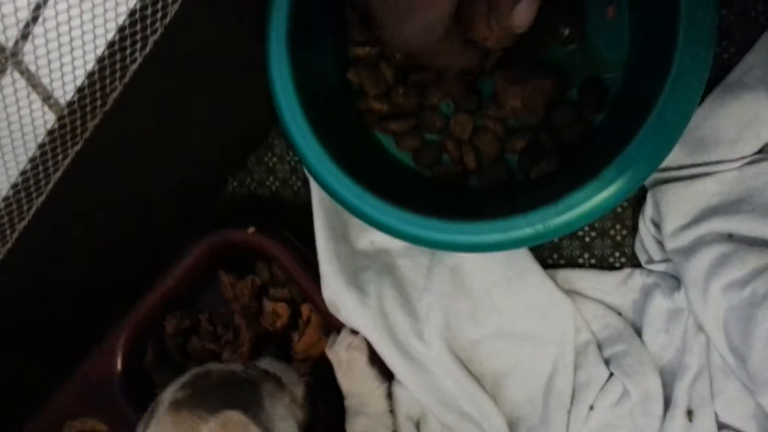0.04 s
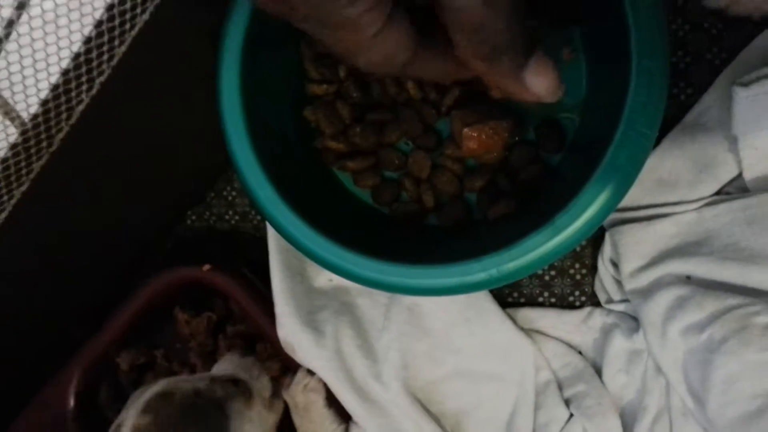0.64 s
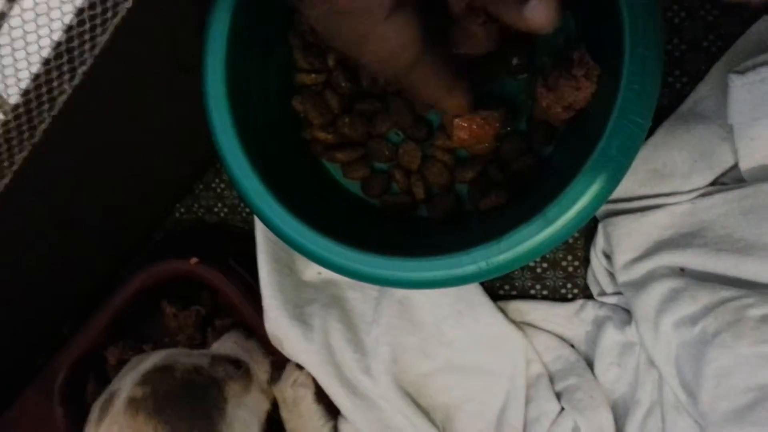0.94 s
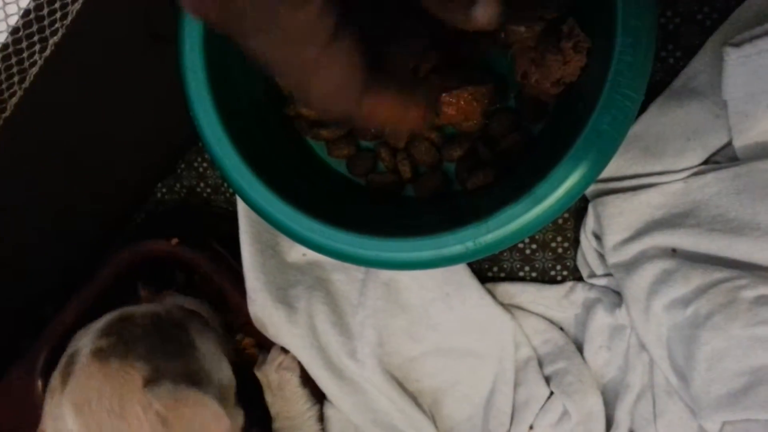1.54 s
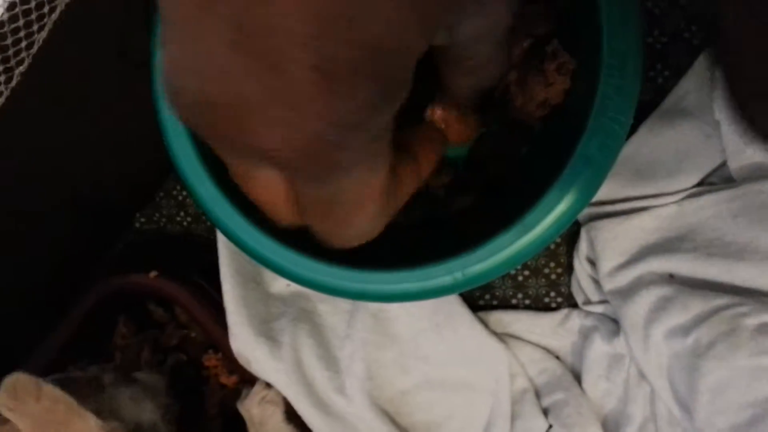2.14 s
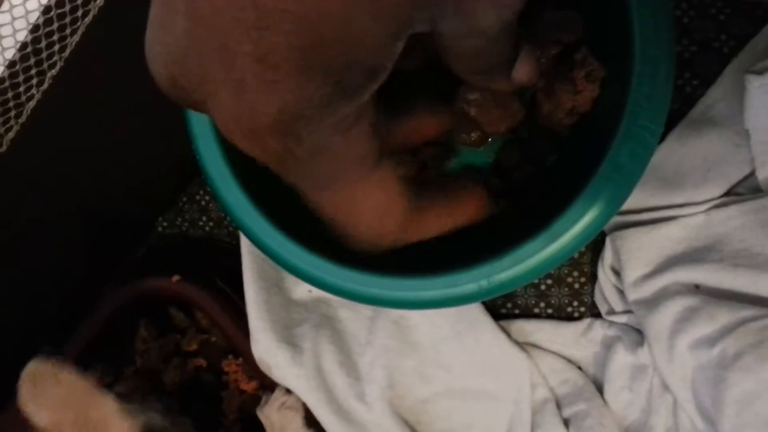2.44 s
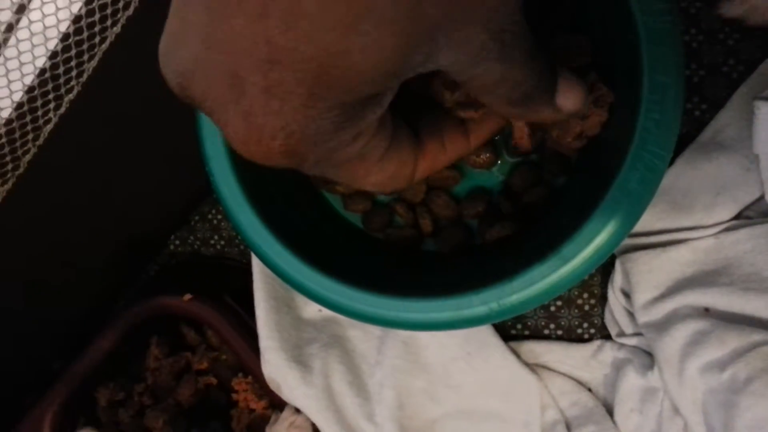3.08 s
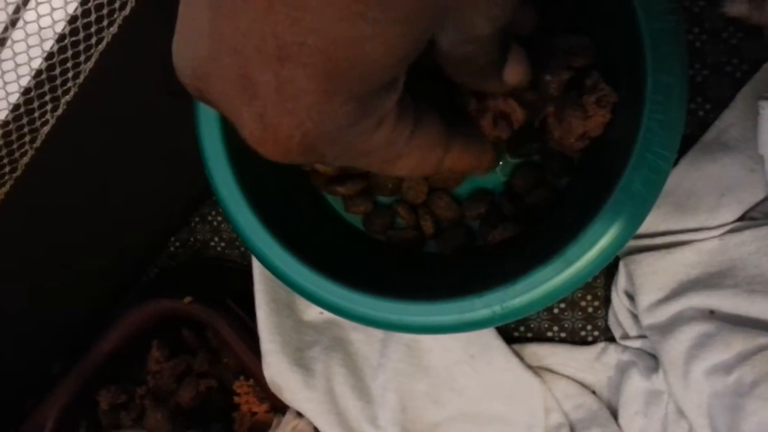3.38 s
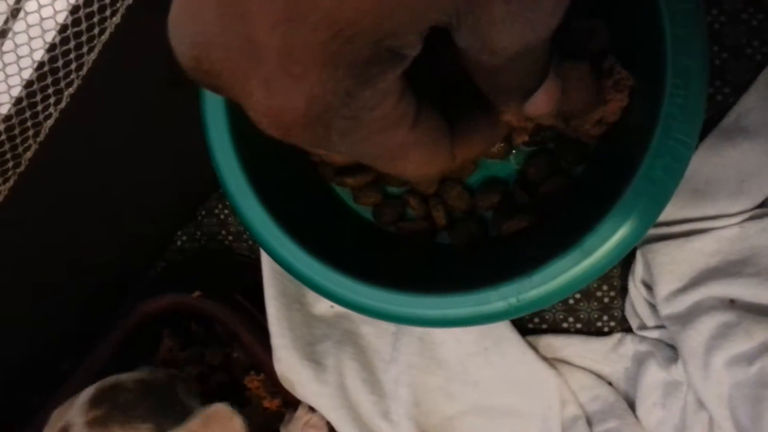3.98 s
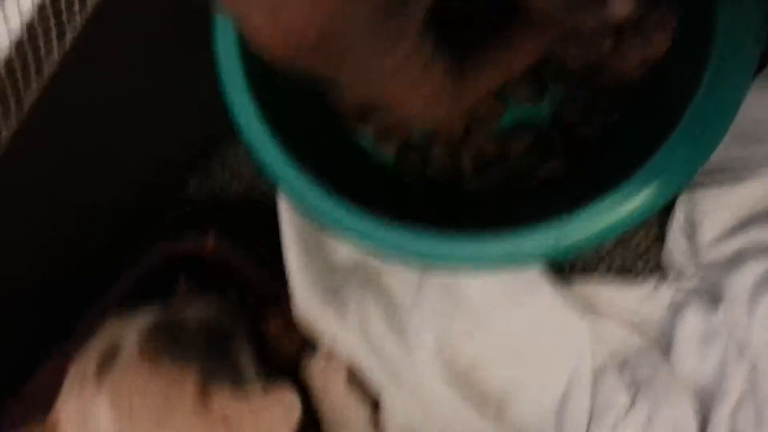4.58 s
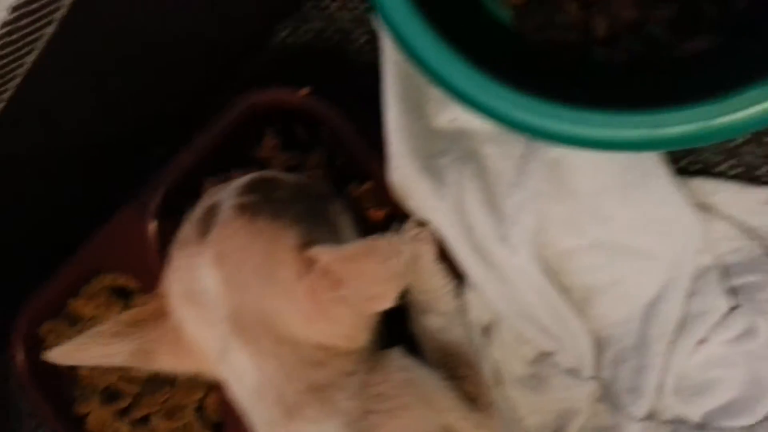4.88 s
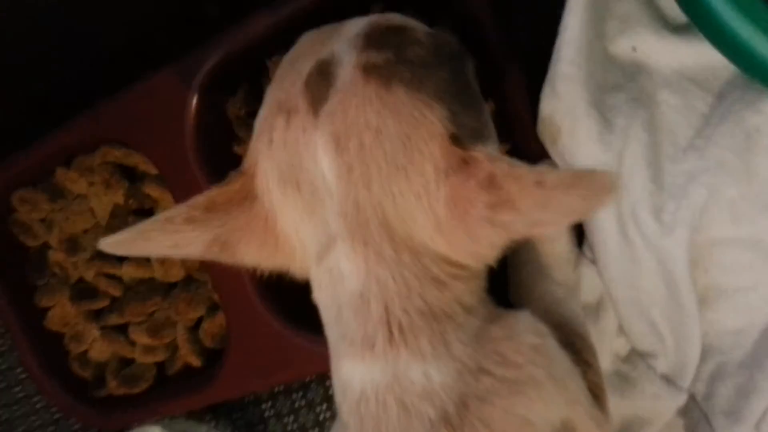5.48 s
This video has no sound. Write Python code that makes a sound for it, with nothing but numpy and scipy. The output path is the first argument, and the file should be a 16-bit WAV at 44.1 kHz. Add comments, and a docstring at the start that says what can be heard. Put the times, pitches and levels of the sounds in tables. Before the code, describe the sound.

Dry pellets rustle and click in a plastic bowl as a puppy eats nearby and shoves its food, with a fan humming.

```python
"""A hand stirs and scoops dry kibble in a plastic bowl, close to a stereo microphone in a small hard room.
Countless pellet contacts merge into a rustle; clumps give way, and bumps set the bowl ringing.
Beside it a puppy smacks and crunches, shoving food across a plastic dish that takes a hollow knock.
A fan hums in the background, and each of the two microphone ports rings at its own treble pitch."""
import sys
import numpy as np
from scipy import signal
from scipy.fft import rfft, irfft, next_fast_len
from scipy.io import wavfile

SR = 44100
rng = np.random.default_rng(int(sys.argv[2]) if len(sys.argv) > 2 else 0)


def bounce(signal):
    """Save signal as a 16-bit WAV file at the path given by the first command-line argument."""
    frames = np.transpose(np.atleast_2d(signal))
    limited = np.clip(frames, -1, 1)
    pcm = np.round(limited * 32767).astype(np.int16)
    wavfile.write(sys.argv[1], SR, pcm)


N = 247842
ROOM_T60_S, NEAR_T60_S = 0.74, 0.19
# The puppy's muzzle shoves food about. Each row: start in seconds, then chatter, grind and skid in dB.
MUZZLE_SHOVES = [(4.811, -34, -56, -17), (4.873, -24, -31, -34), (4.926, -31, -36, -32),
                 (5.036, -35, -34.5, -14), (5.113, -31, -37.5, -25), (5.158, -41, -39.5, -19),
                 (5.209, -43, -42, -12), (5.258, -35, -56, -9)]


def undb(db):
    """Decibels to gain."""
    return 10 ** (np.asarray(db) / 20)


def unit(x):
    """Scale to rms 1."""
    return x / np.sqrt(np.mean(x ** 2))


def colour(x, points):
    """Causal filter through (Hz, dB) points, built from the cepstrum."""
    size = 8192
    hz, db = np.transpose(points)
    bin_hz = np.maximum(np.arange(size // 2 + 1) * SR / size, 1)
    gain = undb(np.interp(np.log(bin_hz), np.log(hz), db))
    cepstrum = irfft(np.log(gain))
    cepstrum[1:size // 2] *= 2
    cepstrum[size // 2 + 1:] = 0
    response = irfft(np.exp(rfft(cepstrum)))
    padded = next_fast_len(N + size, True)
    return irfft(rfft(x, padded) * rfft(response, padded), padded)[..., :N]


def fade(t60):
    """Half a second of exponential decay, falling 60 dB in t60 seconds."""
    return np.exp(-np.log(1000) * np.arange(SR // 2) / SR / t60)


def burst(t60):
    """A short crack of dying noise."""
    return rng.standard_normal(SR // 2) * fade(t60)


def resonate(x, hz, width_hz):
    """One resonance, gain 1 at its centre."""
    return signal.lfilter(*signal.iirpeak(hz, hz / width_hz, fs=SR), x)


def add(track, start_s, sound, db):
    """Put a sound into the track with its peak at db."""
    start = int(start_s * SR)
    track[start:start + len(sound)] += (undb(db) * sound / np.abs(sound).max())[:N - start]


def swell(start_s, push_s, hold_s, settle_db_per_s):
    """Gain of one movement: it builds while pushed, holds, then dies as the food settles."""
    t = np.arange(N) / SR - start_s
    return np.clip(t / push_s, 0, 1) * undb(-settle_db_per_s * np.maximum(t - push_s - hold_s, 0))


def power_sum(swells, levels_db):
    """Overlapping movements add in power."""
    return np.sqrt(undb(levels_db) ** 2 @ swells ** 2)


def contacts(per_s, spread_db, spectrum):
    """Tiny random contacts of uneven hardness; only their long waves reach both ports alike."""
    hardness = undb(spread_db * np.minimum(rng.exponential(size=N), 5))
    mid, side = (rng.random(N) < per_s / SR) * hardness * rng.standard_normal((2, N))
    side = colour(side, [(220, -12), (650, 0)])
    return unit(colour(np.array([mid + side, mid - side]), spectrum))


def reflect(x, wet_db, t60, lag_ms):
    """The direct sound reaches the left port lag_ms late; dense reflections differ at each port."""
    tails = np.array([burst(t60) for _ in range(2)])
    tails /= np.linalg.norm(tails, axis=1, keepdims=True)
    left = np.pad(x, (int(lag_ms * SR / 1000), 0))[:N]
    reflections = signal.fftconvolve(x[None], tails, axes=1)[:, :N]
    wet = undb(wet_db)
    return (np.array([left, x]) + wet * reflections) / np.hypot(1, wet)


def fan():
    """The room's fan hums steadily over moving air, whose bass is much alike at both ports."""
    # Blade, shaft and mains tones. Each row: frequency in Hz, level in dB, left minus right in dB.
    tones = [(120.5, -48, 0), (149.8, -45.5, 1.5), (180.4, -58, 3), (244.6, -55, -5), (363, -50, 1.5)]
    # Rush of the air. Each row: frequency in Hz, gain in dB.
    air_spectrum = [(20, -33), (30, -25), (42, -29), (62, -8), (100, -6.5), (190, -3.5), (270, 2.5),
                    (400, 0), (520, -8.5), (700, -8.5), (1500, -20.5), (2500, -27), (5000, -29),
                    (9000, -47), (14500, -48)]
    t = np.arange(N) / SR
    hum = np.zeros((2, N))
    for hz, db, pan_db in tones:
        amplitude = np.sqrt(2) * undb(db + np.array([[pan_db], [-pan_db]]) / 2)
        hum += amplitude * np.sin(2 * np.pi * (hz * t + rng.random()))
    shared = colour(rng.standard_normal(N), [(150, 2), (350, 3), (700, -8), (2000, -49.5)])
    apart = colour(rng.standard_normal((2, N)), [(100, -1.5), (300, -5.5), (600, -4), (2000, 4)])
    return hum + undb(-42) * unit(colour(shared + apart, air_spectrum))


def chewing():
    """Each smack of the puppy is a brief crack, coloured by its small mouth and the hollow of the dish."""
    # Smacks and bites. Each row: start in seconds, relative level in dB, mouth resonance in Hz.
    bites = [(0.223, -49, 899), (0.269, -31.5, 1710), (0.483, -31, 1320), (0.848, -38.5, 1380),
             (1.032, -41, 1280), (1.206, -32.5, 1470), (1.322, -41, 1270), (1.617, -39, 2130),
             (1.887, -26.5, 1300), (2.004, -39, 2340), (2.044, -40.5, 1140), (2.809, -31, 1920),
             (2.851, -35, 1890), (3.128, -36.5, 1110), (3.526, -26, 1970), (3.538, -41, 1790),
             (3.696, -32.5, 1110), (3.715, -30, 1920), (3.84, -35, 1940), (3.851, -33, 1720)]
    track = np.zeros(N)
    muzzle_band = signal.butter(3, [420, 2400], "bandpass", fs=SR, output="sos")
    for start_s, db, mouth_hz in bites:
        crack = burst(t60=0.0084)
        smack = resonate(crack, mouth_hz, width_hz=800) + resonate(crack, hz=720, width_hz=600)
        add(track, start_s, signal.sosfilt(muzzle_band, smack), db)
    return undb(4.5) * reflect(track, wet_db=-4, t60=NEAR_T60_S, lag_ms=0.17)


def muzzle_gains():
    """Gains of the chatter and the grinding under the puppy's muzzle; all shoves share one shape."""
    starts, chatter_db, grind_db, _ = np.transpose(MUZZLE_SHOVES)
    swells = np.array([swell(s, push_s=0.0067, hold_s=0.02, settle_db_per_s=222) for s in starts])
    return power_sum(swells, chatter_db), power_sum(swells, grind_db)


def dish_scrape(chatter_gain):
    """Food shoved across the dish chatters, with sudden skids, and rings the dish's walls."""
    # Pellets scraping on plastic. Each row: frequency in Hz, gain in dB.
    scrape_spectrum = [(200, -24), (300, -17), (1200, 4.5), (1650, -8), (2050, 12), (2250, -13), (2550, 1),
                       (3200, -18), (8000, -18)]
    # Resonances of the walls. Each row: frequency in Hz, width in Hz, relative gain in dB.
    wall_modes = [(1614, 33, 5), (1920, 30, -22), (1980, 28, -31), (2265, 107, 1.5), (2440, 50, -13)]
    skid_delay_s, skid_hz, skid_width_hz = 0.00309, 2070, 430
    chatter = contacts(per_s=1700, spread_db=-2, spectrum=scrape_spectrum) * chatter_gain
    skids = np.zeros(N)
    for start_s, _, _, db in MUZZLE_SHOVES:
        skid = resonate(burst(t60=0.068), skid_hz, skid_width_hz)
        add(skids, start_s + skid_delay_s, resonate(skid, skid_hz, skid_width_hz), db)
    scrape = undb(-6.5) * chatter + undb(-18.5) * reflect(skids, wet_db=0, t60=ROOM_T60_S, lag_ms=0.52)
    walls = sum(undb(db) * resonate(scrape, hz, width_hz) for hz, width_hz, db in wall_modes)
    return scrape + undb(15) * walls


def vessel_blows(events, modes, rattle_t60, rattle_db, wet_db):
    """A blow, followed by a short rattle of pellets, sets the modes of a plastic vessel ringing."""
    lowest_hz = 204  # such small vessels radiate little below this
    t = np.arange(SR // 2) / SR
    ring = sum(undb(db) * fade(t60) * np.sin(2 * np.pi * hz * t) for hz, db, t60 in modes)
    ring = resonate(ring, hz=modes[1][0], width_hz=1600)  # the soft contact keeps to the low modes
    ring = signal.sosfilt(signal.butter(2, lowest_hz, "highpass", fs=SR, output="sos"), ring)
    track = np.zeros(N)
    for start_s, db in events:
        rattle = burst(rattle_t60)
        rattle *= undb(rattle_db) / np.linalg.norm(rattle)
        add(track, start_s, ring + signal.fftconvolve(rattle, ring)[:len(t)], db)
    return reflect(track, wet_db, ROOM_T60_S, lag_ms=0.05)


def dish_knock():
    """The puppy's dish takes one hollow knock and bounces."""
    # Knock and bounce. Each row: start in seconds, relative level in dB.
    knocks = [(4.44, -26), (4.459, -35)]
    # Ringing of the dish. Each row: frequency in Hz, relative level in dB, t60 in seconds.
    dish_modes = [(310, 0, .06), (500, -6, .13), (543, 0, .19), (690, -11, .08), (1055, -5, .07),
                  (1210, -12, .08)]
    return undb(3.5) * vessel_blows(knocks, dish_modes, rattle_t60=0.05, rattle_db=-4, wet_db=-4)


def bowl_bumps():
    """The bowl gets bumped and rings low into the room."""
    # Bumps. Each row: start in seconds, relative level in dB.
    bumps = [(1.683, -38), (1.696, -31.5), (3.036, -30.5), (3.056, -37), (4.888, -42.5), (4.935, -45),
             (5.044, -38)]
    # Ringing of the bowl. Each row: frequency in Hz, relative level in dB, t60 in seconds.
    bowl_modes = [(214, -6, 0.2), (279.3, -2, 0.36), (300, -37, 0.4), (340, -2, 0.05), (426, -1, 0.088),
                  (475, -21, 0.13), (583, -10, 0.053)]
    return undb(12) * vessel_blows(bumps, bowl_modes, rattle_t60=0.19, rattle_db=-21, wet_db=-5)


def pellet_ticks():
    """Hard little pellets snap or click together, ringing for only a few milliseconds."""
    # Single ticks. Each row: start in seconds, relative level in dB, pitch in Hz.
    ticks = [(0.0453, -43, 4140), (0.0658, -25.5, 4280), (0.195, -26.5, 7070), (0.271, -26.5, 4500),
             (0.2764, -29, 5520), (0.312, -29, 7200), (0.636, -26, 7230), (1.002, -26.5, 6840),
             (1.4601, -50, 5040), (1.6817, -11, 4400), (2.003, -27.5, 3680), (3.4324, -28.5, 7020),
             (3.839, -27.5, 4460)]
    track = np.zeros(N)
    for start_s, db, hz in ticks:
        add(track, start_s, resonate(burst(t60=0.013), hz, width_hz=2800), db)
    return undb(-2) * reflect(track, wet_db=-4, t60=NEAR_T60_S, lag_ms=0)


def collapsing_clumps():
    """A packed clump of pellets lets go in one sharp, quickly fading rush."""
    # Collapses. Each row: start in seconds, relative level in dB.
    collapses = [(0.271, -40), (3.428, -16.5), (4.631, -14.5), (4.8122, -13)]
    rush_hz, width_hz = 5500, 2800
    track = np.zeros(N)
    for start_s, db in collapses:
        rush = resonate(burst(t60=0.18), rush_hz, width_hz)
        add(track, start_s, resonate(rush, rush_hz, width_hz), db)
    return undb(-4) * reflect(track, wet_db=4, t60=NEAR_T60_S, lag_ms=0)


def stirred_kibble(muzzle_press):
    """Close up, pellets rasp, crumbs fizz, and food pressed by hand or muzzle grinds along the plastic."""
    # The hand's strokes. Each row: start, push and hold in seconds, level in dB,
    # settling in dB per second, then grind and fizz offsets in dB.
    strokes = [(0, 0.0033, .11, -46.5, 61, -21, -10), (0.209, 0.017, 0.033, -49, 120, 2.5, -9),
               (0.328, 0.021, 0.21, -35, 96, -12.5, -13.5), (0.469, .012, 0.042, -46.5, 128, 3, -18),
               (0.639, 0.035, 0.016, -35.5, 56, -13, -13), (0.878, 0.017, 0.023, -41.5, 65, -11, -10.5),
               (1.048, 0.1, 0.01, -38, 127, -16, -12.5), (1.159, 0.079, 0.022, -41.5, 135, -5.5, -10.5),
               (1.452, 0.0086, .02, -65.5, 12, -6, -0.5), (1.51, 0.1, .05, -54, 83, -11, -8),
               (1.651, 0.029, 0.011, -24, 94.5, -7.5, -16), (1.915, .06, 0.07, -55.5, 56, 1, -4),
               (2.056, .012, .005, -44, 141, -28, -5.5), (2.158, 0.051, 0.035, -29.5, 20.5, -18, -13),
               (2.8, 0.033, .01, -36, 255, -19, -19), (3.013, 0.03, 0.013, -31.5, 98.5, -13, -13),
               (3.106, 0.086, 0.064, -40, 96, -25, -12), (3.319, 0.024, 0.085, -34.5, 41, -13.5, -11),
               (3.869, 0.057, 0.16, -30, 40, -20.5, -10.5), (4.066, 0.11, 0.12, -31, 29.5, -14, -15.5),
               (4.598, 0.038, 0.011, -27, 113, -18.5, -10.5), (4.797, 0.016, 0.064, -30, 34, -18, -36),
               (4.862, 0.014, 0.11, -34, 60, -9, -10), (5.138, 0.068, 0.064, -30, 132, -11, -15.5),
               (5.3, 0.11, 0.1, -32.5, 52, -10, -14.5), (5.476, 0.074, .05, -28.5, 50, -15.5, -18.5)]
    # Bright rasp, fine fizz and dark grind. Each row: frequency in Hz, gain in dB.
    rasp_spectrum = [(200, 0), (900, -11), (2000, -3.5), (3200, -2.5), (5000, 2.5), (7500, -0.5),
                     (9000, -4), (11000, -6.5), (14500, -11.5)]
    fizz_spectrum = [(3000, -10), (7000, -10), (9000, -5.5), (11000, -5), (14000, 4.5)]
    grind_spectrum = [(120, -16), (280, 19), (480, 11), (750, 8), (1200, 2.5), (1700, 3.5), (2600, -3.5),
                      (4000, -7), (9000, -29)]
    starts, pushes, holds, level_db, settling, grind_db, fizz_db = np.transpose(strokes)
    swells = np.array([swell(*shape) for shape in zip(starts, pushes, holds, settling)])
    press = np.hypot(power_sum(swells, level_db + grind_db), muzzle_press)
    rasp = contacts(per_s=16000, spread_db=-0.96, spectrum=rasp_spectrum) * power_sum(swells, level_db)
    fizz = contacts(per_s=13000, spread_db=1, spectrum=fizz_spectrum)
    fizz *= power_sum(swells, level_db + fizz_db)
    grind = contacts(per_s=3500, spread_db=1.5, spectrum=grind_spectrum) * press
    rustle = undb(-1.5) * rasp + undb(16.5) * fizz
    # A millisecond later the bowl's walls start to throw the rustle back, combing it finely.
    walls = np.array([np.pad(burst(t60=0.06), (SR // 1000, 0)) for _ in range(2)])
    walls /= np.linalg.norm(walls, axis=1, keepdims=True)
    echoes = 0.25 * signal.fftconvolve(rustle, walls, axes=1)[:, :N]
    return rustle + echoes + undb(4.5) * grind


def scene():
    """Hand, puppy and fan as they arrive at the microphone."""
    blows = bowl_bumps() + dish_knock()
    chatter_gain, muzzle_press = muzzle_gains()
    food = stirred_kibble(muzzle_press) + collapsing_clumps() + dish_scrape(chatter_gain)
    return food + blows + chewing() + pellet_ticks() + fan()


def record(dry):
    """Each microphone port adds its own treble resonance; the top is cut steeply."""
    # Responses of the two ports. Each row: frequency in Hz, gain in dB.
    left_port = [(100, 0.5), (300, 0.5), (2200, 3), (3200, 3.5), (4200, 6), (5300, 10.5), (5900, 6.5),
                 (6800, -0.5), (9000, -3.5), (11500, -6), (14500, -16.5)]
    right_port = [(100, 1), (300, -2.5), (2200, 0.5), (4200, -1), (5500, -0.5), (6400, 7), (7300, 13.5),
                  (8300, 7), (10000, 1.5), (12000, -2.5), (14500, -20.5)]
    top_hz = 14550
    ports = np.array([colour(dry[0], left_port), colour(dry[1], right_port)])
    return signal.sosfilt(signal.ellip(12, 0.2, 80, top_hz, fs=SR, output="sos"), ports)


dry = scene()
out = record(dry)
bounce(out)
```